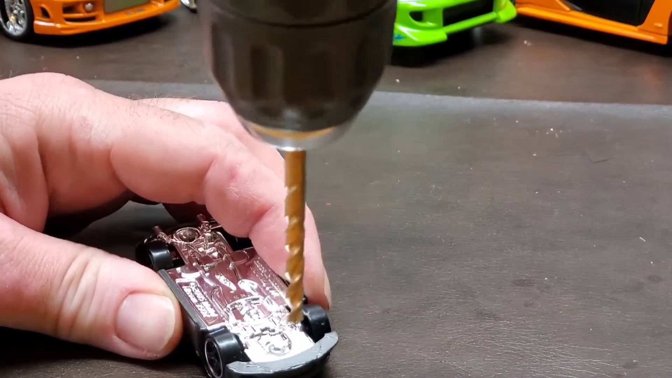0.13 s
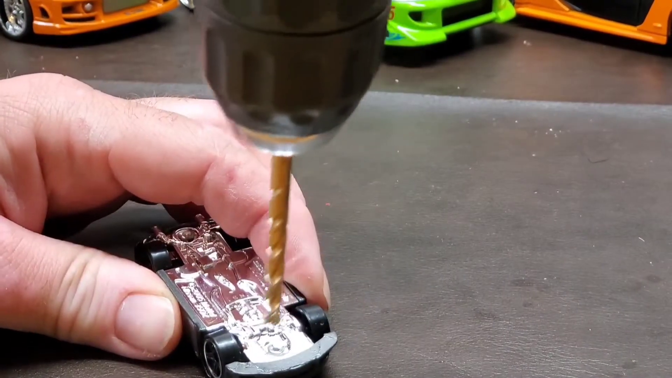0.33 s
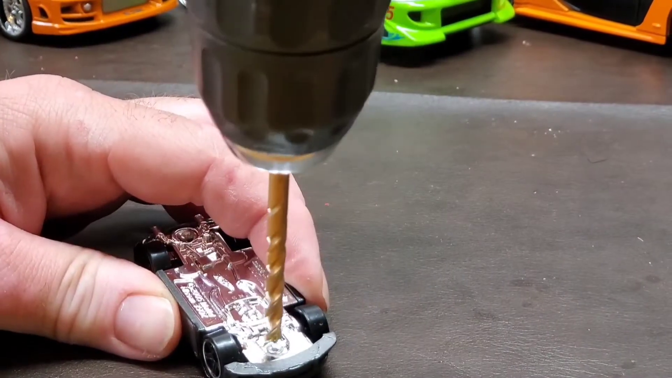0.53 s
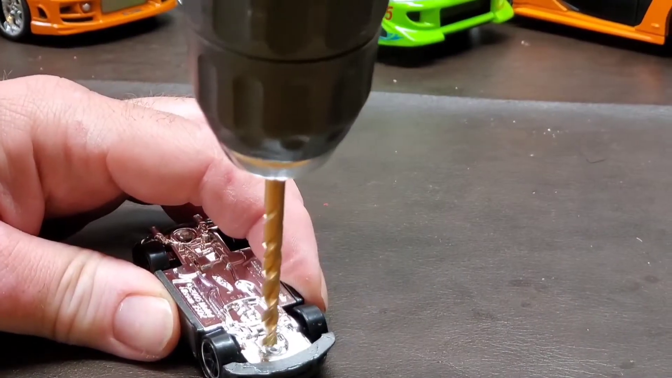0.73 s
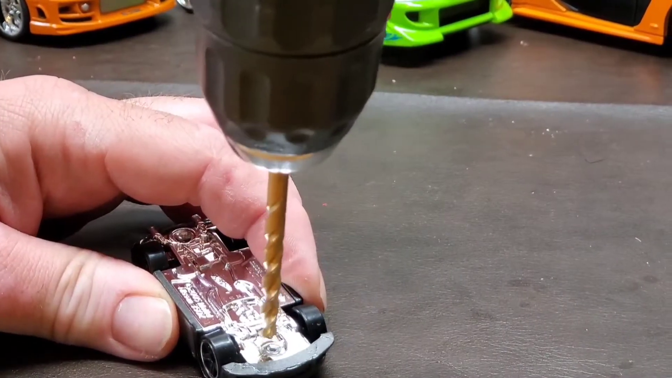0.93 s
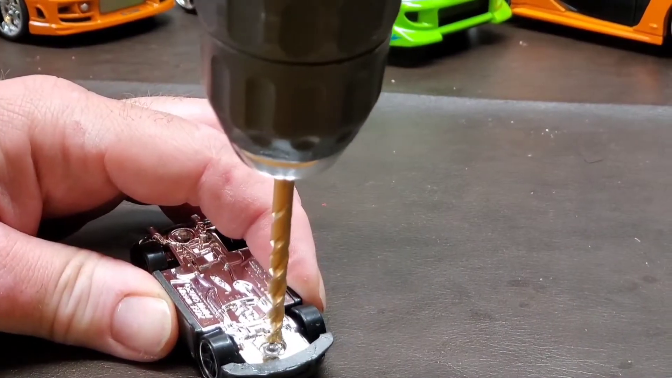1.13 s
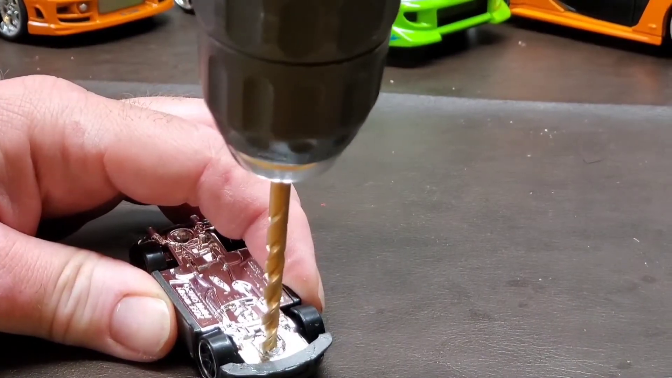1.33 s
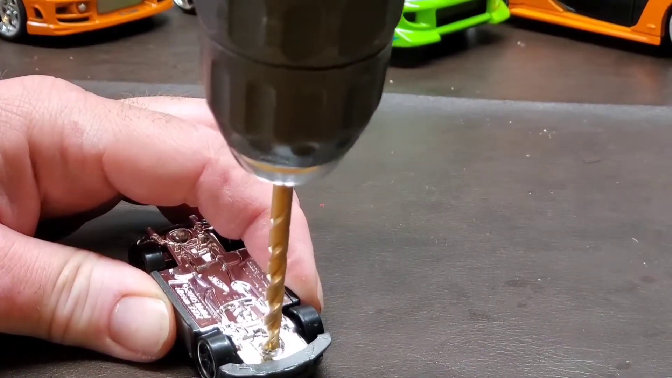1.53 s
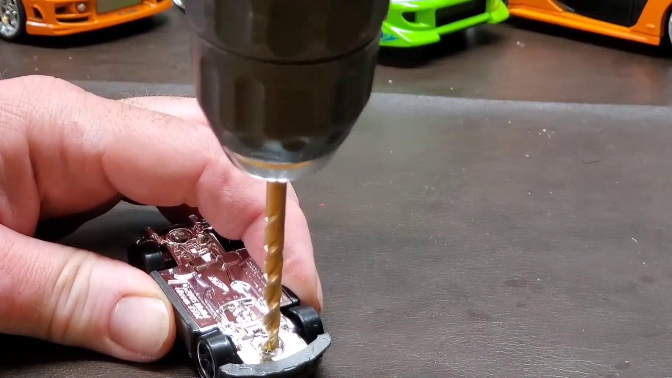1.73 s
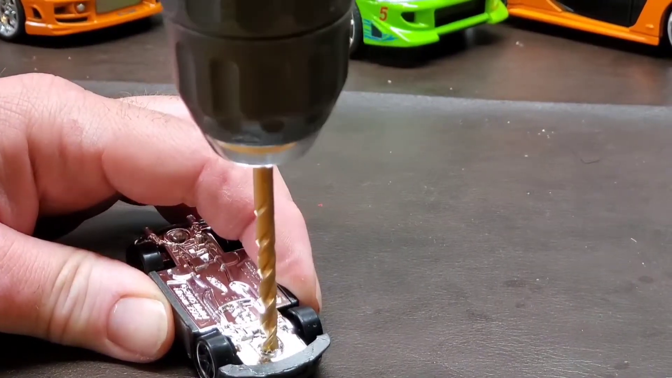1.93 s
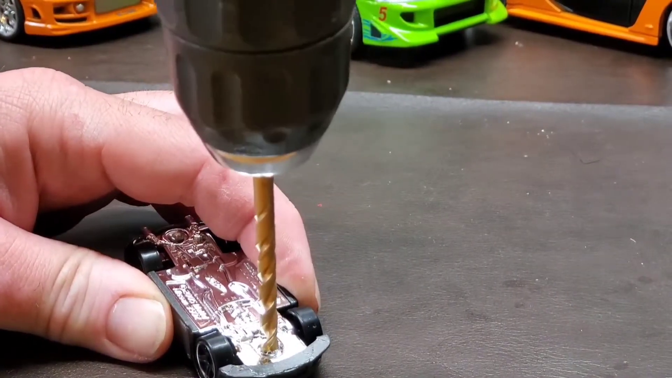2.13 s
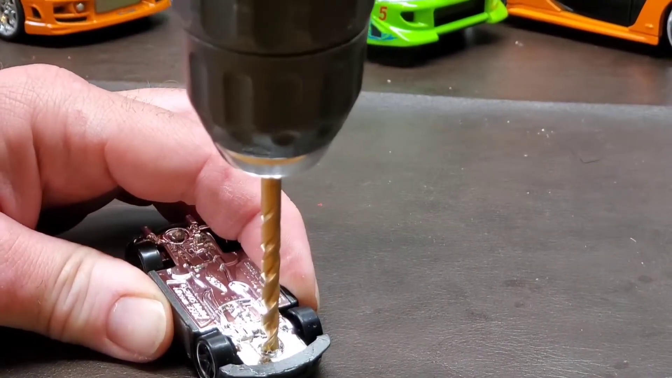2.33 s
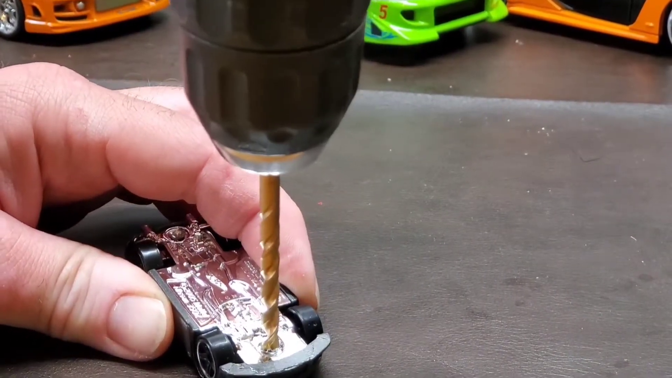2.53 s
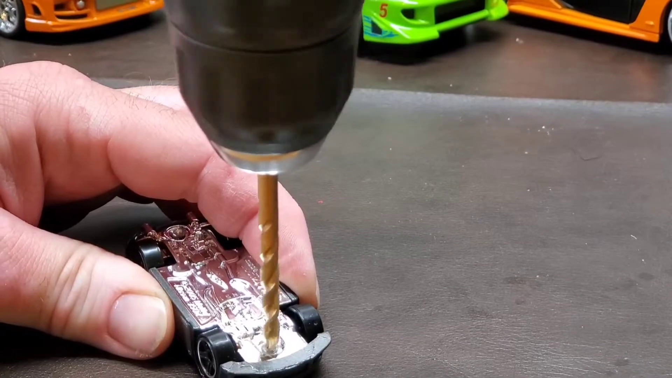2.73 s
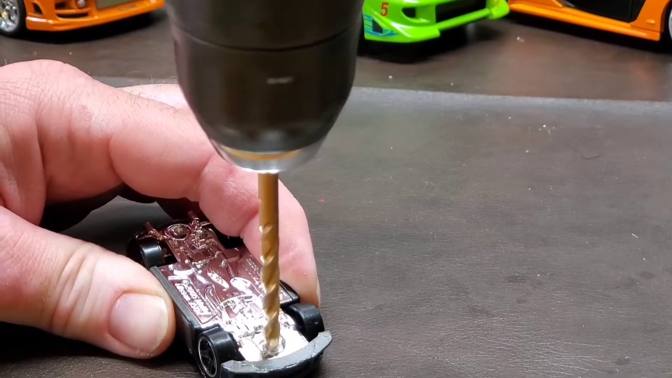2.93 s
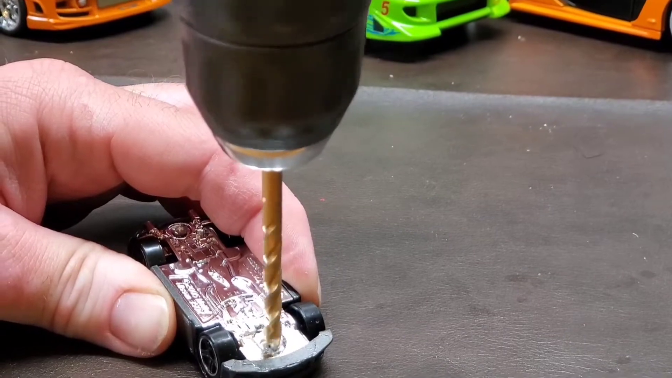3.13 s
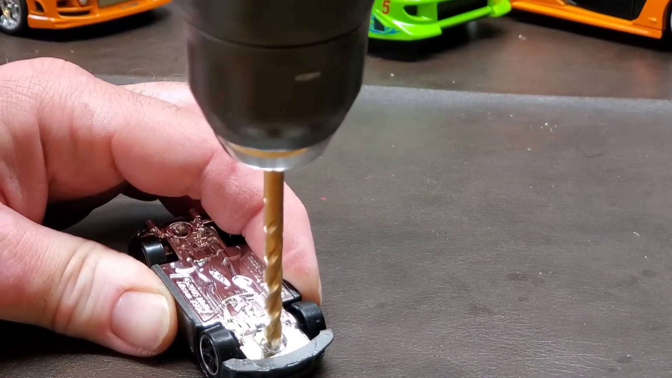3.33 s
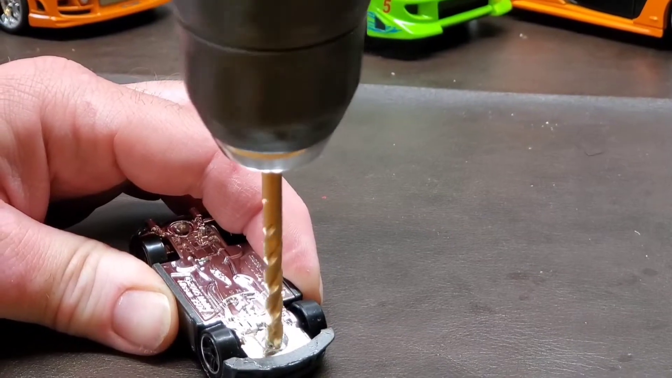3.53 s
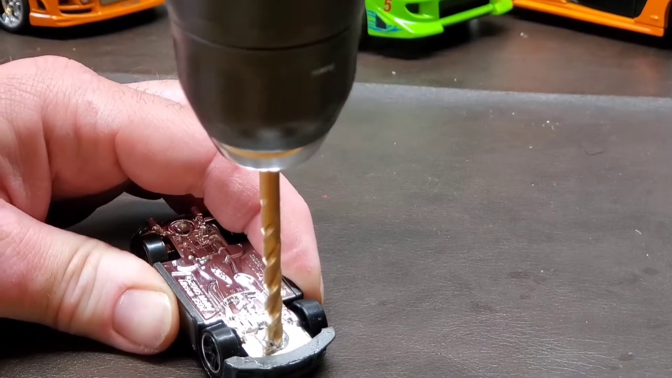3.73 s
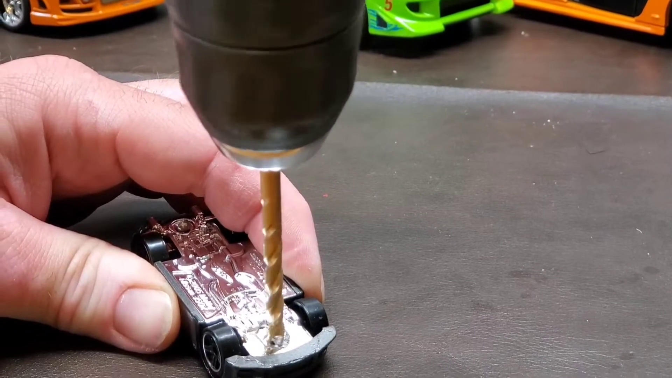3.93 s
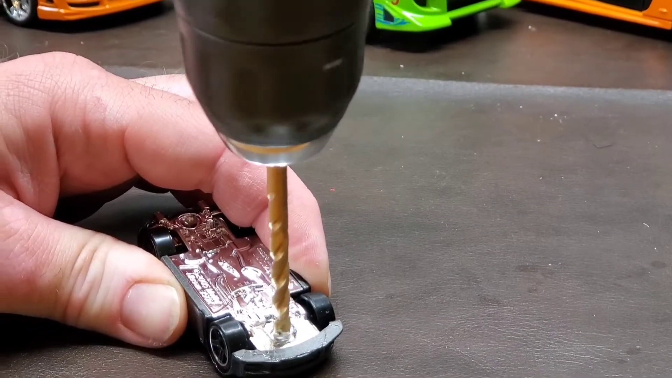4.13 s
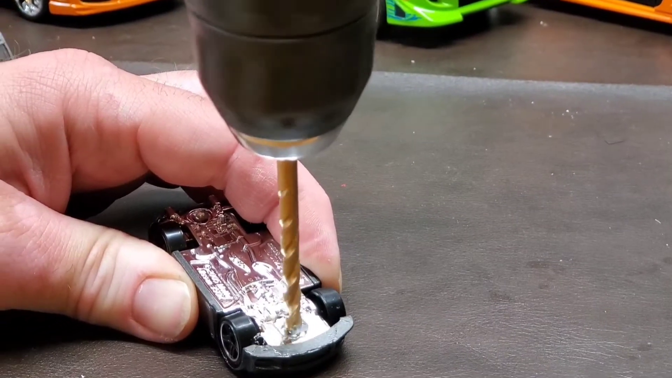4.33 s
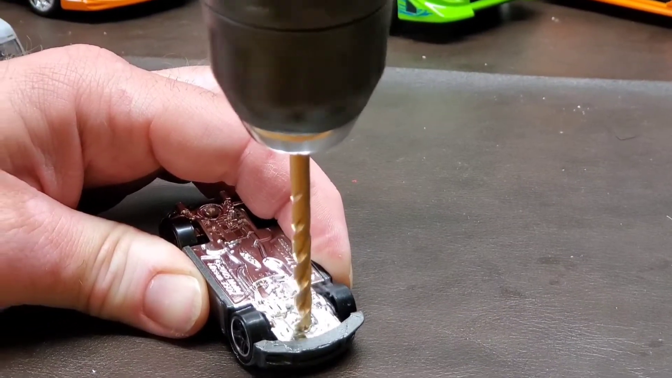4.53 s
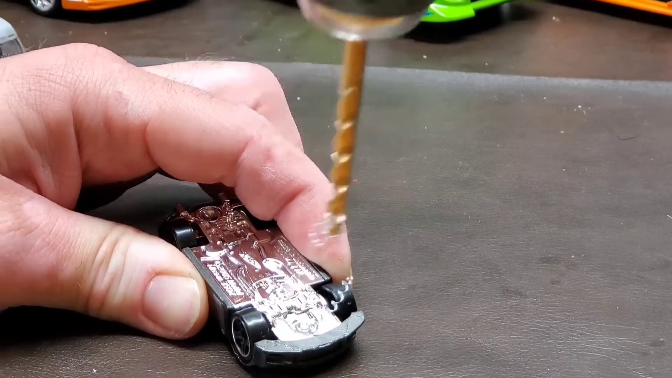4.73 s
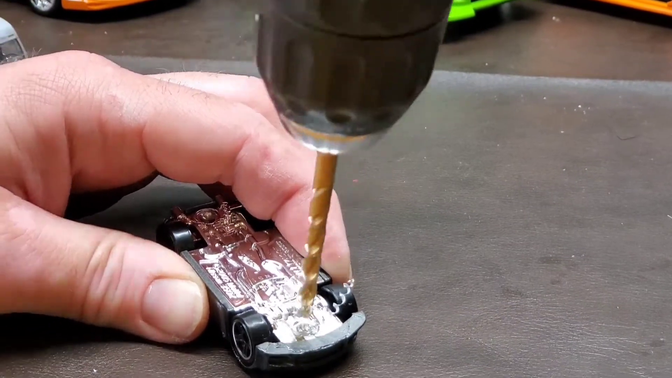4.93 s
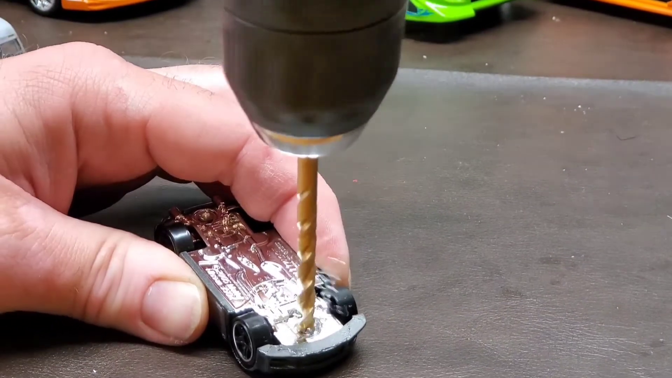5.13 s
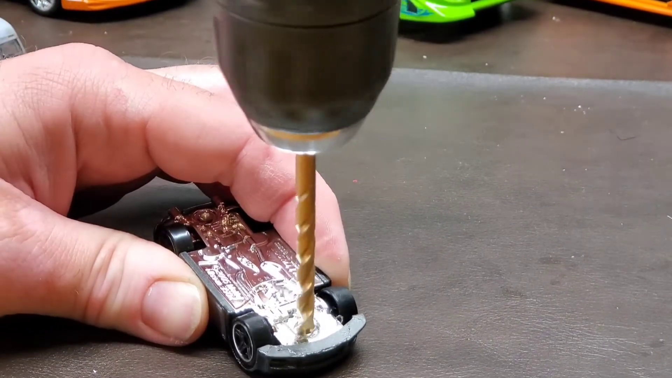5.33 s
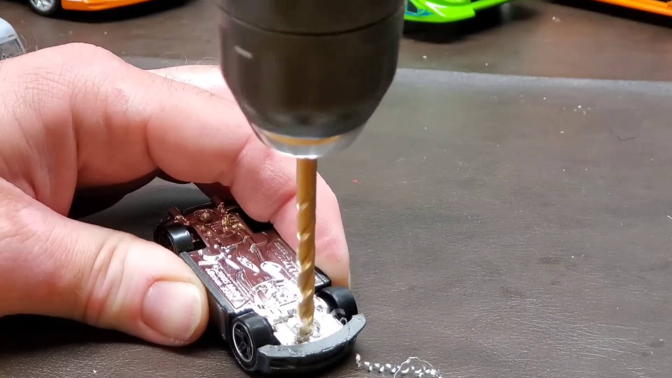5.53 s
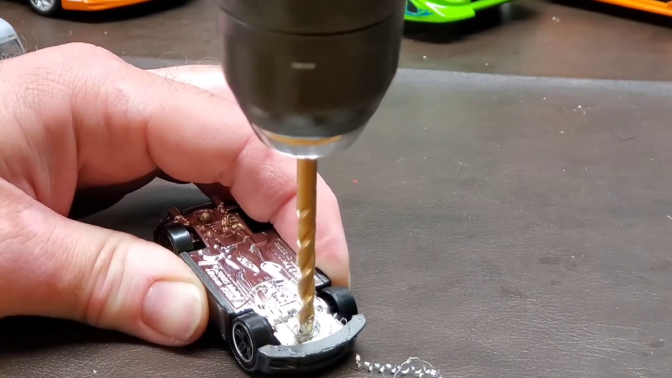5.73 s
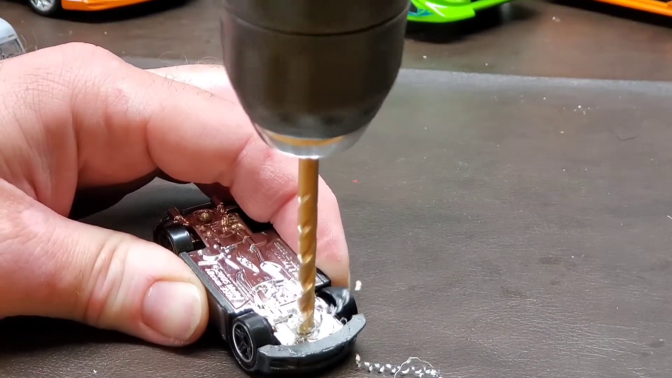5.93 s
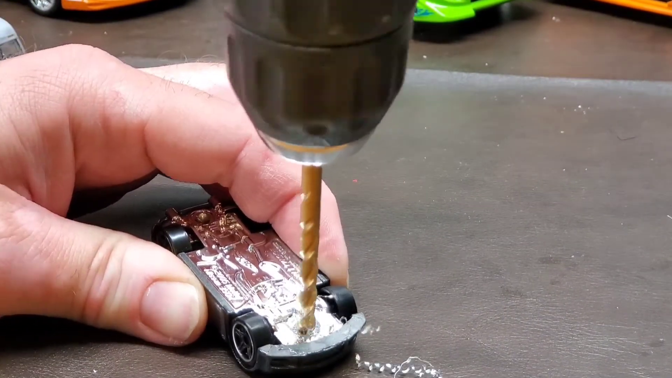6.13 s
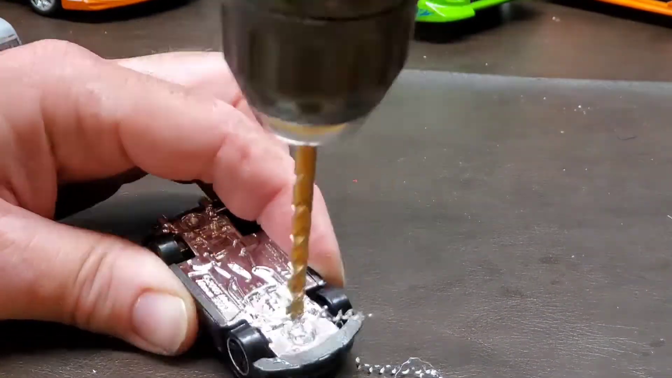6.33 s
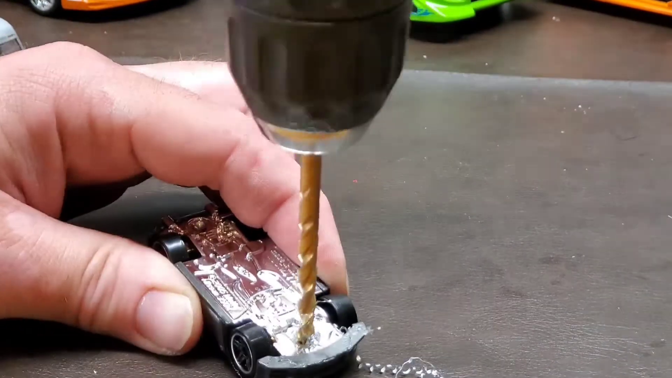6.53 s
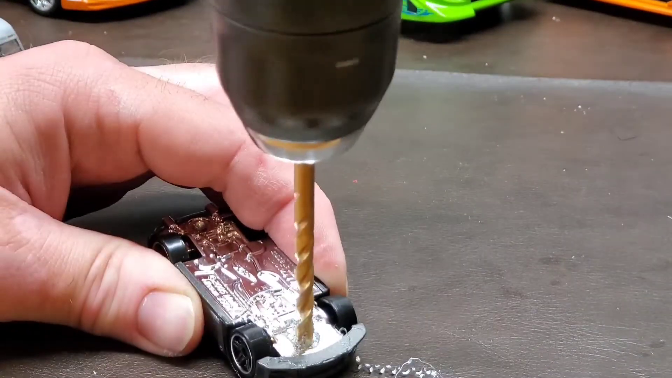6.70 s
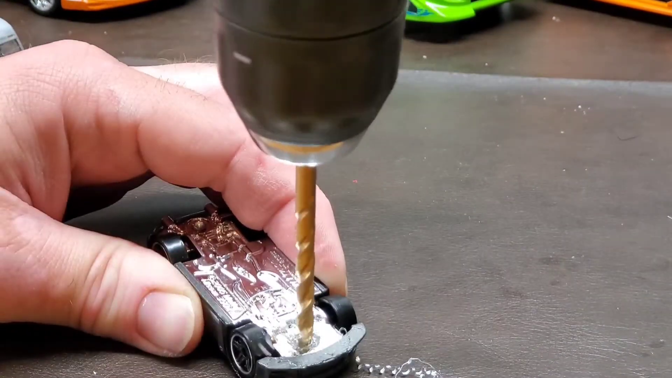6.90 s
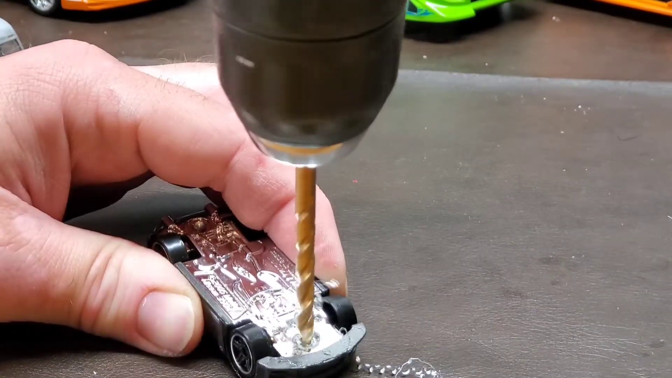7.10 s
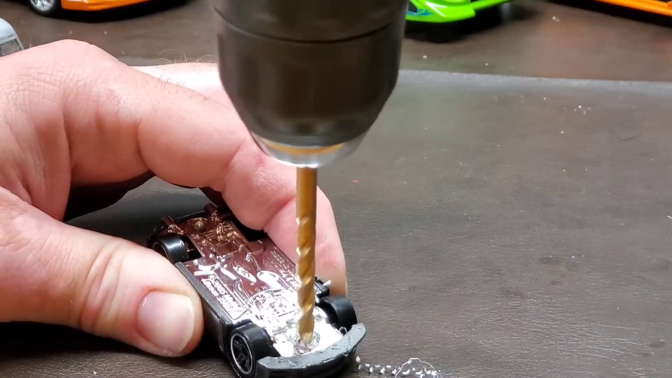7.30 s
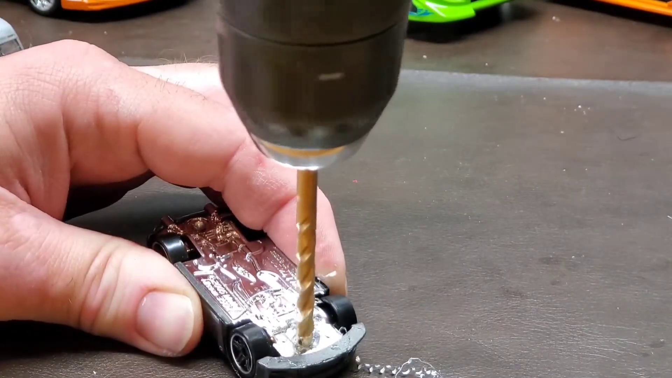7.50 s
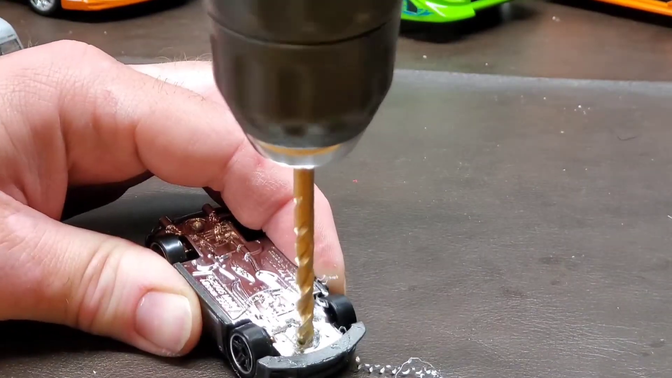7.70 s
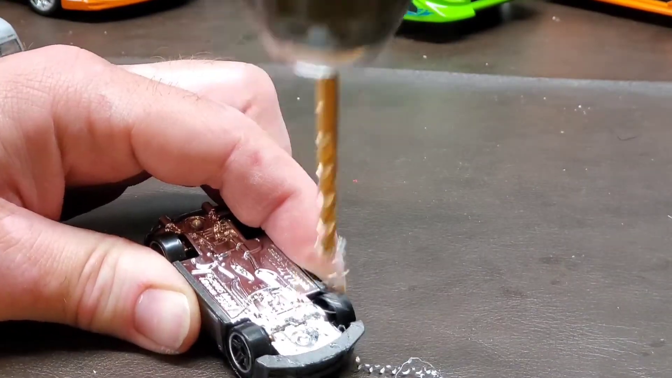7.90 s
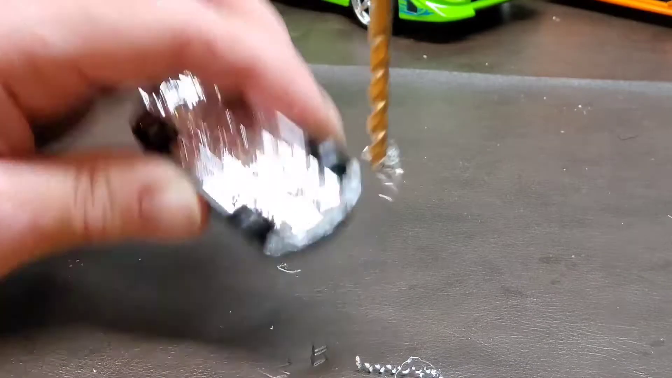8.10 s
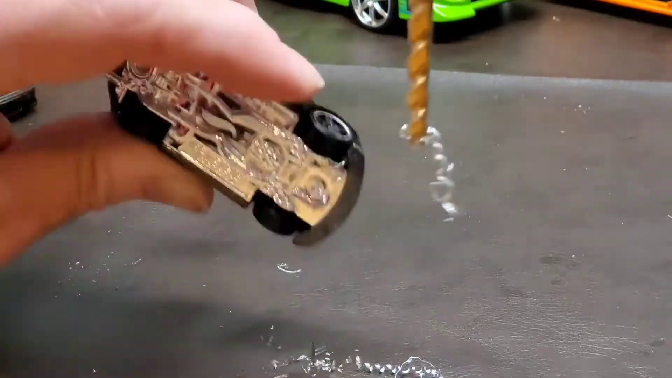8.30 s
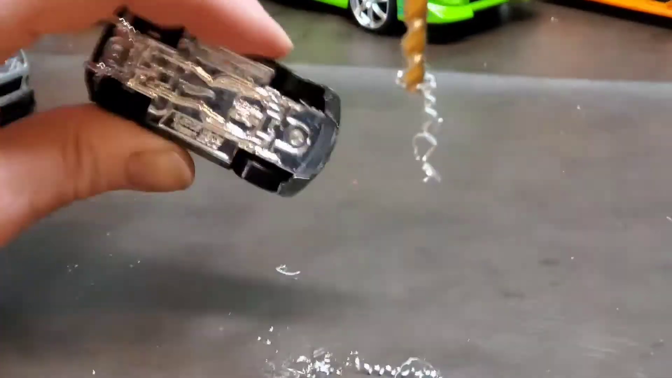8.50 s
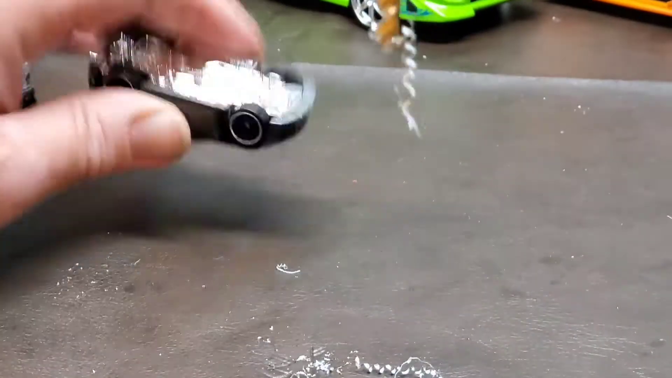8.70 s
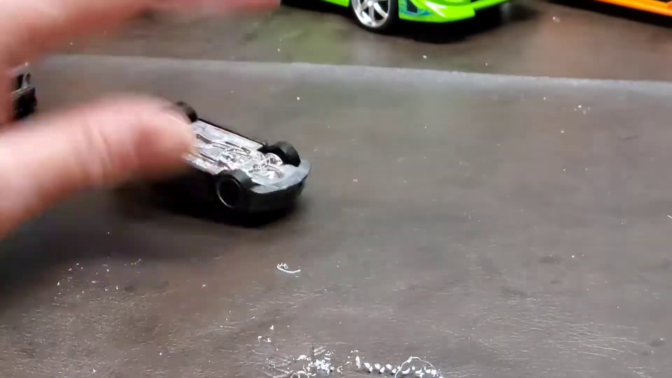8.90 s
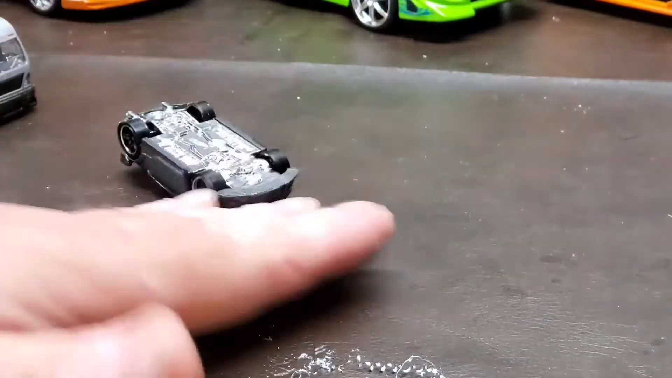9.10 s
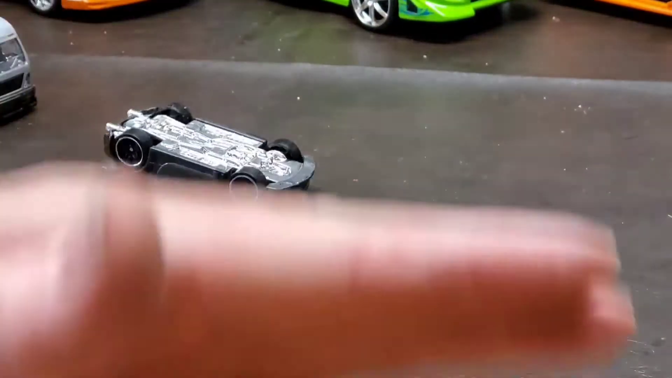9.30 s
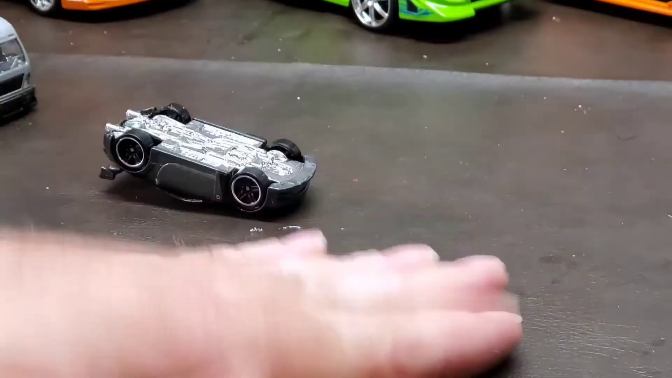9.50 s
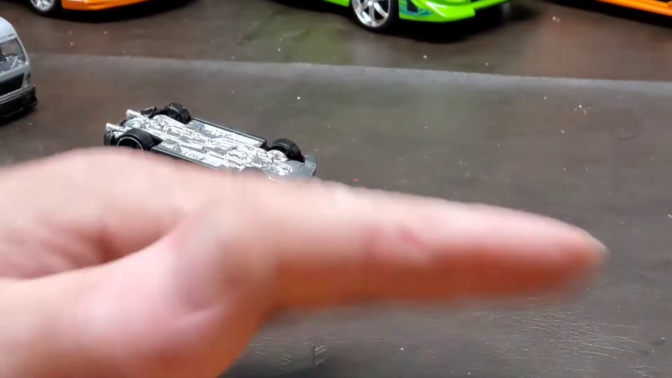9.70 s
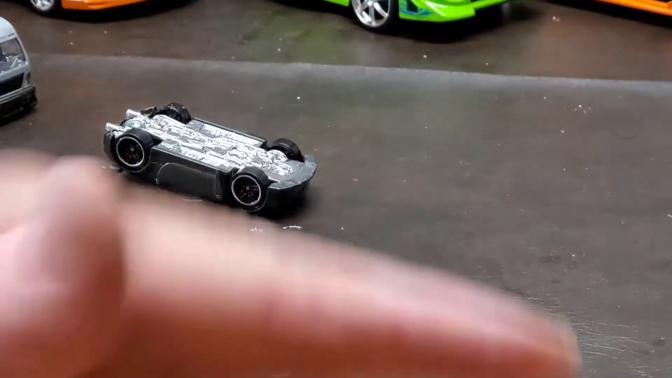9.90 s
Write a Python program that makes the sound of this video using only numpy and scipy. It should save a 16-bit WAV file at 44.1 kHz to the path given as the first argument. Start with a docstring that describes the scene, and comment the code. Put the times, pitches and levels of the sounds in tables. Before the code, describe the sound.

A quiet room with faint low hum, heard close and dry in stereo at a tabletop. From 0.9 to 2.1 s, irregular dull knocks and a light rub as a small metal car meets a drill bit on a mat. At 2.5 s, small taps and a cordless drill climbs to a steady nasal whine with bright hiss and table rumble, its pitch slowly sagging until it stops near 4.7 s. Brief thuds, then a second pull from 5.0 to 6.15 s, slightly lower and sinking. A scrape and sharper knock at 6.4 s. The third pull, 6.5 to 7.8 s, has a momentary dropout near 6.9 s and winds down in pitch. Near 8.4 s, tiny dull pops on the right; thumps at 8.7 and 9.0 s; then broad hand swishes around 9.2, 9.55 and 9.8 s, with a final low bump.

```python
"""A quiet room is heard first, then knocks on a table: a small die-cast car on a mat meets a drill bit.
In three pulls the cordless drill bores: gear tones locked to its speed ride on shaped motor noise and rumble.
Between pulls short rough blows excite damped modes of table and car, and friction noise swells in strokes.
A finger nudges the two-port phone that listens close by, as decaying pops; at the end a hand
sweeps the shavings off the mat."""
import sys
import numpy as np
from scipy import signal
from scipy.io import wavfile
from scipy.ndimage import uniform_filter1d

SR = 44100
rng = np.random.default_rng(int(sys.argv[2]) if len(sys.argv) > 2 else 0)


def transcribe(signal):
    """Save signal, clipped to [-1, 1], as a 16-bit WAV file at the path in sys.argv[1]."""
    frames = np.atleast_2d(signal).T
    limited = np.clip(frames, -1, 1)
    pcm = np.round(limited * 32767).astype(np.int16)
    wavfile.write(sys.argv[1], SR, pcm)


N = 438794

# Spectrum of the quiet room. Each row: frequency in Hz, relative density in dB per Hz.
ROOM_SPECTRUM = [(15, -20.5), (50, 2), (120, -14.5), (300, -14), (500, -10.5), (1000, -20), (2700, -23.5),
                 (5200, -33), (7000, -36), (16300, -35.5)]
# Hum of faint machines in the house. Each row: frequency in Hz, width in Hz, boost in dB.
HOUSE_HUM = [(119.7, 28.6, 23.5), (236, 31, 12.5), (318, 27, 12.5)]
ROOM_DB = -56

# Likeness of the two ports, before each source scales it. Each row: frequency in Hz, likeness from 0 to 1.
PORT_LIKENESS = [(30, 0.67), (90, 0.94), (300, 0.9), (640, 0.38), (1400, 0.12), (2500, 0.24), (5000, 0.12),
                 (15000, 0.04)]
# Balance of the two ports. Each row: frequency in Hz, left over right in dB.
PORT_BALANCE = [(380, -0.5), (700, 2.5), (1300, 1.5), (8000, 0.5), (15000, 4)]
PORT_LEAD_S = 0.00023  # the left port hears the table earlier, in full only at high frequency

# Finger against the phone by its right port.
# Each row: start in seconds, level in dB, pitch in Hz, decay by 60 dB in seconds.
FINGER_NUDGES = [(8.3893, -6, 440, 0.02), (8.425, -20, 300, .025), (8.4475, -24, 450, 0.02),
                 (8.4628, -11, 294, 0.02), (8.4681, -14, 530, 0.026)]

# Skin and car sliding on the mat, a row a stroke.
# Each row: loudest moment in seconds, hiss level in dB before a common cut of 2.5 dB, rise and fall in seconds.
RUB_STROKES = [(1.782, -54, 0.018, 0.14), (4.865, -59, 0.03, 0.027), (4.93, -64, .05, .08),
               (6.19, -59.5, .025, .1), (6.375, -55.5, 0.019, .08), (6.44, -38.5, .03, 0.046),
               (8.345, -58.5, .05, .05), (8.45, -53.5, .3, 0.46), (8.733, -47, 0.039, 0.087),
               (8.93, -54.5, 0.59, .3), (8.983, -44, 0.048, 0.086), (9.23, -34, .3, 0.074),
               (9.49, -51, .05, .1), (9.55, -36, 0.11, .11), (9.81, -33, 0.068, .11), (9.9, -62, .1, .2)]
# Low drag through the table, then skin hiss. Each row: frequency in Hz, relative density in dB per Hz.
RUB_SPECTRUM = [(30, -2), (100, 8), (300, 8.5), (600, 6.5), (1300, 10.5), (2700, 11.5), (5000, 7),
                (10000, 3.5), (14500, 6.5), (16300, 2.5)]
STROKE_END_DB, STROKE_BEND = -33.5, 1.46  # level one rise or fall from the top, and how round the top is

# Blows on the table. Each row: start in seconds, thud peak in dB, strongest pitch in Hz,
# time from start to full force in seconds, tick over thud in dB before a common lift of 6 dB.
TABLE_KNOCKS = [(0.932, -25.5, 339, .006, -29), (0.946, -41, 600, .002, -7), (0.96, -33, 294, 0.0095, -19),
                (1.002, -33, 333, 0.0065, -22.5), (1.208, -34, 323, 0.0083, -24),
                (1.237, -53, 330, .0015, -2), (1.305, -34, 325, 0.0074, -23),
                (1.341, -36.5, 333, .0067, -24), (1.364, -31.5, 348, 0.0074, -31),
                (1.464, -32.5, 326, 0.008, -29), (1.489, -41, 312, 0.0075, -22),
                (1.705, -43.5, 315, .006, -31), (1.775, -42, 94, .0015, 3), (2.057, -45, 126, .003, -7),
                (2.476, -50, 320, 0.0018, 2), (2.491, -35, 304, .005, -12), (2.507, -40, 330, 0.0026, -3),
                (4.855, -36.5, 332, 0.0059, -15), (4.898, -35.5, 116, 0.0048, -28),
                (4.931, -29.5, 331, 0.0037, -25), (6.384, -40.5, 700, 0.0035, 5.5),
                (6.429, -22, 358, 0.0058, -22), (6.44, -29, 500, 0.0014, 2.5),
                (8.724, -21, 334, 0.0066, -21.5), (8.761, -30.5, 199, 0.012, -27),
                (8.978, -33.5, 112, 0.003, -3), (9.471, -37.5, 118, 0.0077, -5.5),
                (9.776, -23, 112, 0.0029, -3.5), (9.85, -37.5, 120, 0.0075, -25)]
# Modes of the table. Each row: frequency in Hz, level in dB, decay by 60 dB in seconds.
TABLE_MODES = [(107, -10, 0.098), (122.5, 2, 0.16), (200.5, 0.5, 0.073), (316.5, 1.5, 0.073),
               (349, 5, 0.068), (432, 1, 0.036), (520, -2, 0.067), (580, -2, 0.053), (840, -14, 0.019)]
# Modes of the metal car. Each row: frequency in Hz, level in dB, decay by 60 dB in seconds.
CAR_MODES = [(1330, -3, 0.0025), (2130, 18, 0.0023), (3320, 2, 0.0017), (4870, -4, 0.008),
             (8100, -6, 0.006), (12100, -1, .003)]
KNOCK_BALANCE_DB = 2.5  # left over right

# Trigger pulls. Each row: start in seconds, rise in seconds, moment the bit lifts in seconds, moment of
# release in seconds, fall in seconds, bend of the fall (1 is even), motor hiss at the start in dB, hiss drift
# in dB per second, table rumble over the hiss at the start in dB, rumble drift in dB per second.
TRIGGER_PULLS = [(2.47, .21, 4.64, 4.6, 0.078, 2.3, -26, -0.4, -5, 1.5),
                 (4.972, 0.057, 6.12, 6.085, 0.074, 1.63, -27.5, -0.04, -2, 0.1),
                 (6.53, 0.059, 7.5, 7.65, 0.18, .9, -27, -5, -0.2, -2.5)]
# Gear mesh rate, a table a pull: spin-up, then sag as the bit bites. Each row: time in seconds, rate in Hz.
MESH_RATE = [
    [(2.46, 399.3), (2.6, 471), (2.7, 565), (2.8, 616), (2.95, 670), (3.15, 680), (3.5, 674.6),
     (3.93, 663.6), (4.1, 648.2), (4.685, 629)],
    [(4.975, 480), (5.02, 532.5), (5.05, 611), (5.1, 641), (5.5, 627), (6.085, 604), (6.145, 600)],
    [(6.53, 488.5), (6.575, 530.3), (6.61, 586), (6.67, 615.8), (6.93, 594), (7.2, 597.9), (7.585, 615.7),
     (7.64, 552), (7.8, 419)],
]
# Radiation of a mesh tone at its pitch. Each row: frequency in Hz, level over the hiss in dB.
MESH_RADIATION = [(450, -11), (540, -8.5), (600, -0.5), (620, -4), (645, -11), (680, -12), (900, -27),
                  (1070, -6), (1190, -13.5), (1228, -7.5), (1270, -14.5), (1345, -3.5)]
# Mesh tone and its octave at the ports. Each row: left over right in dB, lead of the left in radians.
MESH_PORTS = [(8.5, -0.85), (-0.5, 0.72)]
# Other gear tones. Each row: multiple of the mesh rate, level over the hiss in dB at a 640 Hz mesh,
# gain in dB per octave of speed, left over right in dB, lead of the left in radians.
GEAR_TONES = [(.712, -8, -26.5, 0, -0.5), (1.2, -10, 37, 1, 1.5), (1.43, -37, 20, -3, -2),
              (3, -24, 11, -11, 2), (8, -22, 1.5, -3, 6.5), (8.998, -31, -2, -4, -2.5)]
# Brushes, fan and cutting edge. Each row: frequency in Hz, relative density in dB per Hz.
HISS_SPECTRUM = [(500, -50), (800, -8.5), (1100, -12), (1500, -9.5), (2600, -12), (5000, -10.5),
                 (10000, -14), (16300, -16)]
# Resonances of the housing. Each row: frequency in Hz, width in Hz, change in dB.
HOUSING_PEAKS = [(2050, 260, 1), (2705, 260, -2.5), (3100, 520, 3), (4890, 370, 3), (8350, 392, 4.5),
                 (11500, 1200, 4.5), (15300, 650, 7.5)]
# Rumble carried by the table. Each row: frequency in Hz, relative density in dB per Hz.
RUMBLE_SPECTRUM = [(20, -71), (60, -24.5), (115, -16.5), (250, -11), (400, -6), (560, -7.5), (760, -15),
                   (950, -23), (1300, -51.5)]
# The table top under the drill. Each row: frequency in Hz, width in Hz, boost in dB.
TABLE_TOP_PEAKS = [(125, 20, 8.5), (333.5, 21.8, 17.5), (426, 10, 6)]
# A brief dip of level heard within the last pull: its start, its end and the full level, in seconds.
LEVEL_DIP = (6.888, 6.903, 6.917)
AFTER_DIP_DB = 3.  # gain on the rest of the pull, after the dip
DEPTH_DB, RISE_BEND = -48.5, 1.75  # the hiss climbs from and sinks to this far below its level
RUMBLE_FOLLOW, TONE_FOLLOW = 0.76, 0.99  # share of that climb and fall taken by rumble and mesh tones
COAST_DB_PER_S = -700  # with the trigger let go the teeth unload and the tones die
LIFT_DB, LIFT_S = -5, 0.074  # the rumble drops as the bit leaves the metal

EDGE_HZ = 15780  # upper band limit


def amp(db):
    """Decibels are twenty times the logarithm of an amplitude ratio."""
    return 10 ** (np.asarray(db) / 20)


def unit(x):
    """Division by the root mean square gives a signal of unit power."""
    return x / np.sqrt(np.mean(x ** 2) + 1e-20)


def read(points, hz):
    """A curve over frequency is interpolated along a logarithmic axis."""
    f, value = np.transpose(points)
    return np.interp(np.log(hz + 1), np.log(f + 1), value)


def played(tables):
    """Successive time tables join into one piecewise linear curve."""
    return np.interp(np.arange(N) / SR, *np.vstack(tables).T)


def wander(hz):
    """Low-pass filtered chance varies slowly, up to about hz, with rms 1."""
    steps_per_s = 200
    steps = rng.standard_normal(int(N / SR * steps_per_s) + 2)
    smooth = signal.lfilter([1], [1, -np.exp(-2 * np.pi * hz / steps_per_s)], steps)
    smooth = uniform_filter1d(smooth, size=3)
    return unit(np.interp(np.arange(N) / SR * steps_per_s, np.arange(len(steps)), smooth))


def noise(shape, peaks=(), patchy_db=1., likeness=.9):
    """Random spectra under a fixed envelope make noise; partial coherence sets its width at two ports."""
    hz = np.fft.rfftfreq(2048, 1 / SR)[:, None]
    a, b, c, d, patches = rng.standard_normal((N // 512 + 5, 1025, 5), np.float32).T
    # patches of level drift over time and frequency
    patches = uniform_filter1d(patches, size=8, axis=0)
    patches = unit(uniform_filter1d(patches, size=5, axis=1))
    db = read(shape, hz) + patchy_db * patches
    db = db + sum(up / (1 + (2 * (hz - f) / width) ** 2) for f, width, up in peaks)
    same = np.clip(likeness * read(PORT_LIKENESS, hz), 0, 1)
    left = a + 1j * b
    delay_s = PORT_LEAD_S * hz ** 2 / (hz ** 2 + 700 ** 2)  # bass reaches both ports together
    late = np.exp(-2j * np.pi * hz * delay_s)
    right = same * left * late + np.sqrt(1 - same ** 2) * (c + 1j * d)
    balance = amp(read(PORT_BALANCE, hz) / 2)
    spectra = amp(db) * np.array([left * balance, right / balance])
    out = signal.istft(spectra, nperseg=2048, noverlap=1536)[1][:, :N]
    return out / np.sqrt(np.mean(out.mean(0) ** 2))


def room():
    """Steady background noise carries narrow hum resonances and a slow drift of level."""
    return amp(ROOM_DB + .7 * wander(2.5)) * noise(ROOM_SPECTRUM, HOUSE_HUM, patchy_db=.8, likeness=.92)


def nudges():
    """A damped shell gives a dead, sharp-edged pop; the far port hears mostly a low shake."""
    out, t = np.zeros((2, N)), np.arange(4000) / SR
    onset = np.sin(np.pi / 2 * np.minimum(t / 0.00065, 1)) ** 2
    skin_filter = signal.butter(4, 2200, fs=SR)
    for s, db, hz, t60 in FINGER_NUDGES:
        pop = amp(-60 * t / t60) * -np.cos(2 * np.pi * hz * t) * onset
        skin = signal.lfilter(*skin_filter, 5 * rng.standard_normal(len(t)))
        pop += amp(-30.5 - 60 * t / 0.067) * skin  # skin rasps
        shake = amp(-24.5 - 60 * t / 0.076) * np.sin(2 * np.pi * 110 * t)
        at = round(s * SR)
        out[:, at:at + 4000] += amp(db) * np.array([shake + amp(-28) * pop, pop + shake])
    return out


def rubbing():
    """Friction makes fine hiss over a low drag that the table passes on; each stroke swells and fades."""
    t, power = np.arange(N) / SR, np.zeros(N)
    for s, db, rise, fall in RUB_STROKES:
        distance = abs(t - s) / np.where(t < s, rise, fall)
        power += amp(db + STROKE_END_DB * distance ** STROKE_BEND) ** 2
    flutter = amp(-2.5 + 1.3 * wander(80))
    return np.sqrt(power) * flutter * noise(RUB_SPECTRUM, patchy_db=2.0, likeness=0.96)


def ring(modes, weight_db, blow):
    """A body's response is its sum of decaying modes convolved with a short rough blow; peak 1."""
    t = np.arange(6000) / SR
    rings = sum(amp(db + weight_db(hz) - 60 * t / t60) * np.sin(2 * np.pi * hz * t) for hz, db, t60 in modes)
    out = signal.fftconvolve(rings[None], blow, axes=1)[:, :5000]
    return out / abs(out).max()


def knocks():
    """Each impact excites the table's modes around its own pitch and rasps in the metal car."""
    out, t = np.zeros((2, N + 5000)), np.arange(3000) / SR
    grit = rng.standard_normal((len(TABLE_KNOCKS), 3, 3000))
    soft = signal.butter(2, [70, 1000], "bandpass", fs=SR)  # the mat cushions the blow that reaches the table
    sides = amp(np.array([[.5], [-.5]]) * KNOCK_BALANCE_DB)
    sides = sides / sides.mean()
    for (s, db, centre_hz, length, tick_db), g in zip(TABLE_KNOCKS, grit):
        age = t / np.clip(length, .0005, .015)
        force = age * np.exp(1 - age)
        table_blow = signal.lfilter(*soft, g[:1] * force)
        thud = ring(TABLE_MODES, lambda hz: -6 * np.log2(hz / centre_hz) ** 2, table_blow)
        car_blow = (g[1:] + .5 * g[0]) * force ** 2  # partly shared by the two ports
        tick = ring(CAR_MODES, lambda hz: 0, car_blow)
        at = round(s * SR)
        out[:, at:at + 5000] += amp(db) * (thud + amp(tick_db + 6) * tick) * sides
    return out[:, :N]


def trigger():
    """A motor climbs, drifts and sinks: running (0 or 1), then edge, coasting, hiss and rumble in dB."""
    t, out = np.arange(N) / SR, np.zeros((5, N))
    for (start, rise, lift, release, fall, bend,
         hiss_db, hiss_drift_db, rumble_db, rumble_drift_db) in TRIGGER_PULLS:
        on, age = (t >= start) & (t < release + fall), t - start
        climb = np.clip(1 - age / rise, 0, 1) ** RISE_BEND
        sink = np.clip((t - release) / fall, 0, 1) ** bend
        edge_db = DEPTH_DB * (climb + sink)
        coast_db = COAST_DB_PER_S * np.maximum(t - release, 0)
        lift_db = LIFT_DB * np.clip((t - lift) / LIFT_S, 0, 1)
        out += on * np.array([on, edge_db, coast_db, hiss_db + hiss_drift_db * age,
                              rumble_db + rumble_drift_db * age + lift_db])
    return out


def tone(turns, db, balance_db, lead, waver_db):
    """A sine wavers in level and phase as the load on the teeth changes."""
    side = np.array([[.5], [-.5]])
    phase = 2 * np.pi * turns + .5 * wander(12) + lead * side
    level = amp(db + waver_db * wander(12) + balance_db * side)
    return np.sqrt(2) * level * np.sin(phase)


def level_dip_db():
    """A gain curve in dB over time dips the level briefly and then holds it higher."""
    start, back, full = LEVEL_DIP
    times = [start - .001, start + .001, back - .004, back, back + .001, full]
    return np.interp(np.arange(N) / SR, times, [0, -15, -21, -34, -6, AFTER_DIP_DB])


def drill():
    """Meshing teeth radiate tones locked to the speed, over motor hiss and a throbbing table rumble."""
    on, edge_db, coast_db, hiss_db, rumble_db = trigger()
    mesh_hz = played(MESH_RATE)
    turns = np.cumsum(mesh_hz) / SR  # mesh cycles so far
    speed = np.log2(mesh_hz / 640)  # octaves
    throb_db = 0.35 * np.sin(2 * np.pi * turns / 54) + 1.35 * wander(23)  # the chuck turns once in 54 cycles
    chatter_db = 1.1 * np.sin(2 * np.pi * turns) + 0.74 * wander(40)  # each meeting of teeth jolts the hiss
    hiss = noise(HISS_SPECTRUM, HOUSING_PEAKS, patchy_db=1.9, likeness=1.0)
    out = amp(edge_db + chatter_db) * hiss
    rumble = noise(RUMBLE_SPECTRUM, TABLE_TOP_PEAKS, patchy_db=0.9, likeness=1.63)
    out += amp(RUMBLE_FOLLOW * edge_db + rumble_db + throb_db) * rumble
    for multiple, ports in enumerate(MESH_PORTS, 1):
        radiated_db = read(MESH_RADIATION, multiple * mesh_hz)
        out += tone(multiple * turns, TONE_FOLLOW * edge_db + coast_db + radiated_db, *ports, 3.2)
    # the other gear tones die away at low speed
    slack_db = edge_db + coast_db + 50 * np.minimum(speed + .13, 0)
    for multiple, db, slope_db, balance_db, lead in GEAR_TONES:
        out += tone(multiple * turns, db + slope_db * speed + slack_db, balance_db, lead, 3.)
    return on * amp(hiss_db + level_dip_db()) * out


def scene():
    """Sound pressures of independent sources add linearly."""
    return drill() + knocks() + nudges() + rubbing() + room()


def record(dry):
    """A linear-phase low-pass filter sets the band limit of the recorder."""
    lowpass = signal.firwin(1023, EDGE_HZ, window=("kaiser", 9), fs=SR)
    return signal.oaconvolve(dry, lowpass[None], "same")


dry = scene()
out = record(dry)
transcribe(out)
```